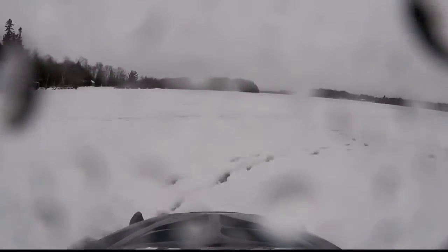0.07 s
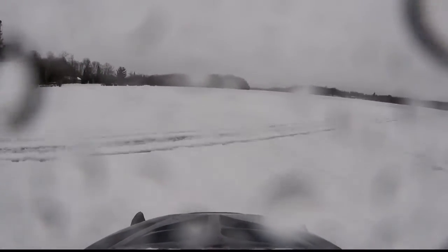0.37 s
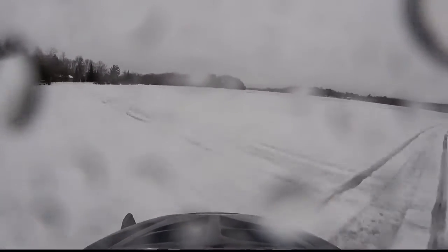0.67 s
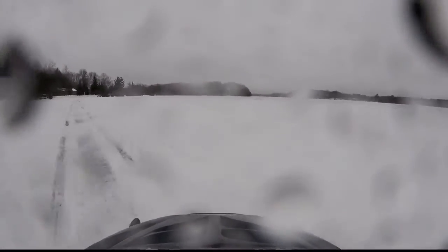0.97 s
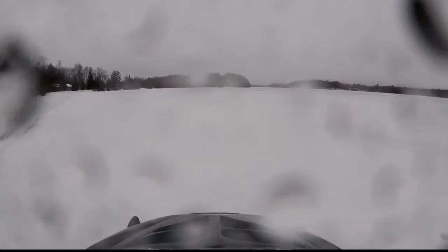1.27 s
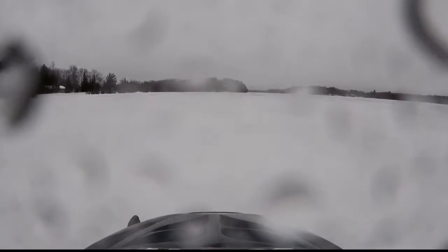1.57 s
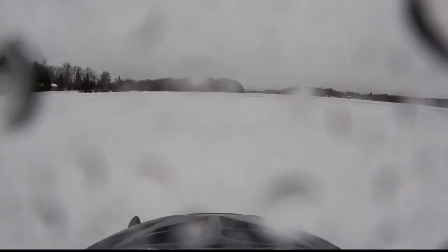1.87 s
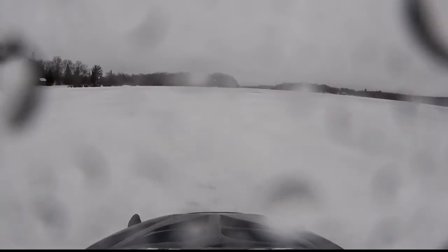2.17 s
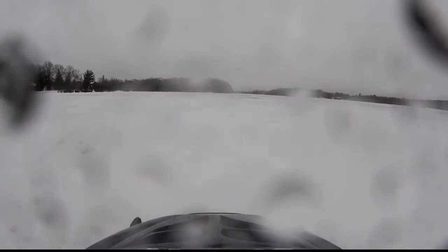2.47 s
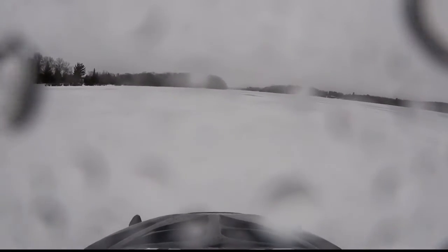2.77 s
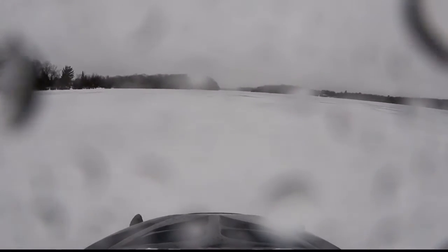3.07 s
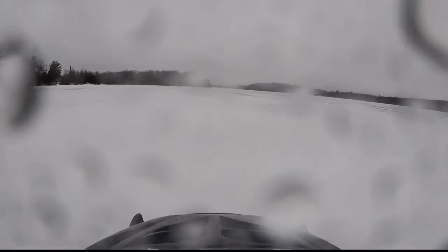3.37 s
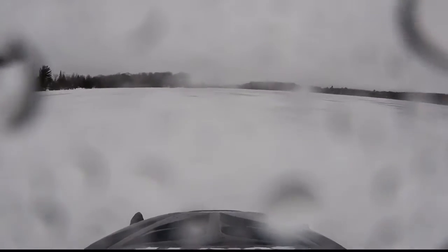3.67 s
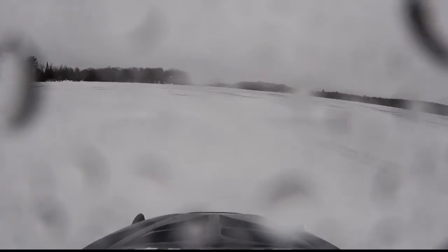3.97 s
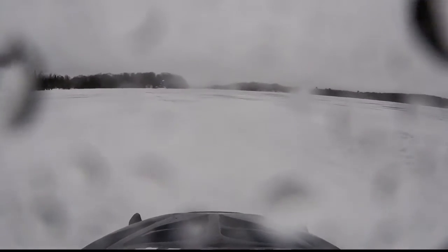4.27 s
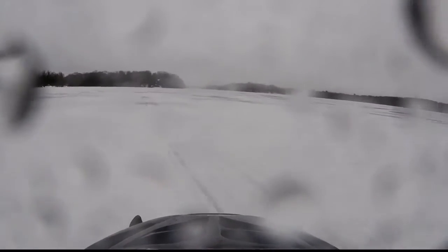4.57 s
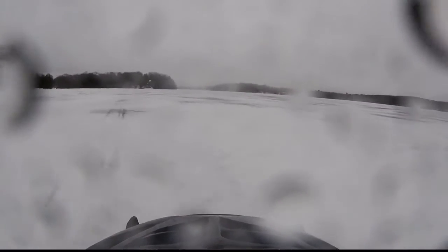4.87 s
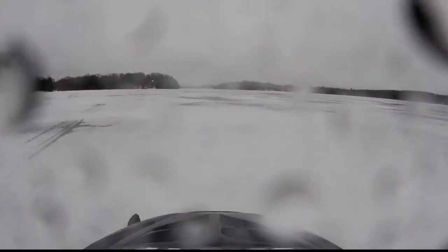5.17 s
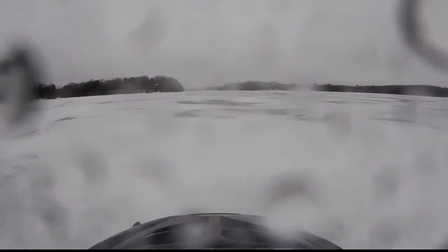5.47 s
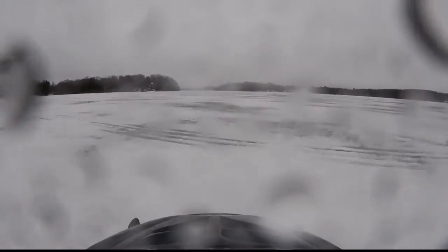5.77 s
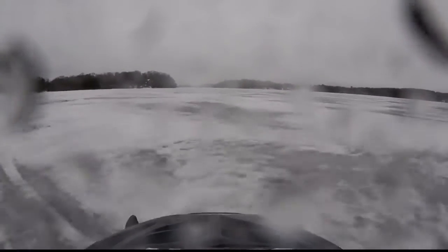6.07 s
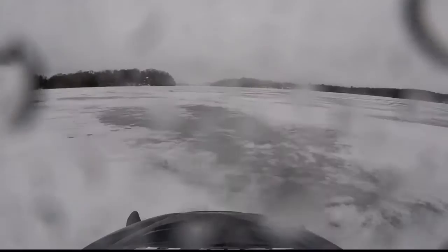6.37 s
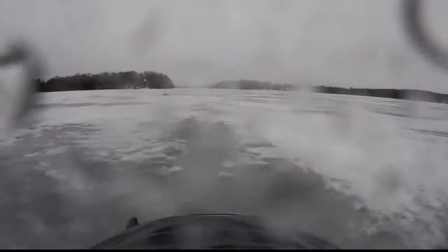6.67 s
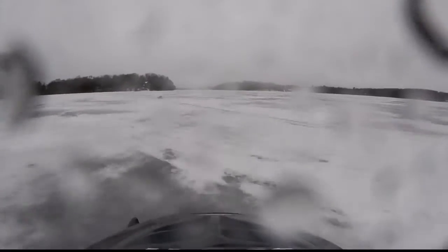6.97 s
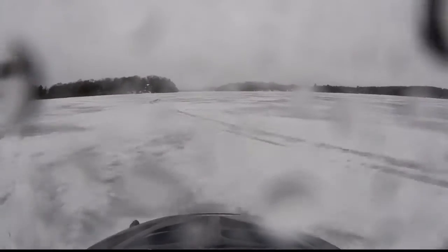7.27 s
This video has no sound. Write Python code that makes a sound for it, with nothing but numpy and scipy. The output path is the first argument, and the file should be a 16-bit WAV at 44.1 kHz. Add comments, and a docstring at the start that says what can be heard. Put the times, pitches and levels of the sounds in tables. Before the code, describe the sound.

A snowmobile runs at speed across a frozen lake, heard up close from the rider's position. Its engine holds a low drone with a thin, raspy whine, wavering only slightly, while the track hums and churns the snow. Wind rumbles on the microphone throughout. Bumps add dull thuds and sharp clicks from the camera housing, which come more often in the last couple of seconds.

```python
"""On a frozen lake, a snowmobile runs at speed, heard from a camera in a closed housing on its rider.
Wind buffets the housing, bumps shake it, and it clicks and knocks, ringing briefly in its modes.
The track hums and churns the snow, the engine rasps and whines as it revs, and the exhaust
drones in harmonics of the firing rate, coloured by the resonances of its pipe.
The camera's limiter ducks under the bumps and recovers slowly."""
import sys
import numpy as np
from scipy.fft import rfft, irfft, next_fast_len
from scipy.io import wavfile
from scipy.ndimage import uniform_filter1d, minimum_filter1d, map_coordinates

SR = 44100
rng = np.random.default_rng(int(sys.argv[2]) if len(sys.argv) > 2 else 0)


def materialize(psi):
    """Save the field psi as 16-bit PCM at rate SR to the path in sys.argv[1].

    A 1-D psi becomes a single channel; in a 2-D psi each row is a channel.
    """
    bounded = np.clip(np.atleast_2d(psi).T, -1, 1)
    quanta = np.round(bounded * 32767).astype(np.int16)
    wavfile.write(sys.argv[1], SR, quanta)


N = 326340


def amp(db):
    """Decibel law: 20 dB is a tenfold amplitude."""
    return np.exp(np.asarray(db) * np.log(10) / 20)


def unit(x):
    """Normalisation to rms 1."""
    return x / np.sqrt(np.mean(x ** 2) + 1e-20)


def curves(rows):
    """Linear interpolation: one value per sample for each column after the time."""
    times, *columns = np.transpose(rows)
    return [np.interp(np.arange(N) / SR, times, column) for column in columns]


def wobble(rate):
    """Random modulation: a smooth curve through rate Gaussian knots a second."""
    knots = rng.standard_normal(int(N * rate / SR) + 4)
    coarse = np.arange(0, N + 64, 64)
    return np.interp(np.arange(N), coarse, map_coordinates(knots, [coarse * rate / SR]))


def filtered(x, response):
    """Linear filtering: the spectrum of x times a frequency response."""
    size = next_fast_len(N + SR // 2)
    return irfft(rfft(x, size) * response(np.fft.rfftfreq(size, 1 / SR)), size)[:N]


def shaped(x, spectrum):
    """Spectral shaping by (frequency [Hz], gain [dB]) points on a log frequency axis."""
    points_hz, db = np.transpose(spectrum)
    return filtered(x, lambda hz: amp(np.interp(np.log(hz + 1), np.log(points_hz), db)))


def coloured(x, spectrum):
    """Colouring at constant power: x shaped, at rms 1."""
    return unit(shaped(x, spectrum))


def turns(rate_hz, jitter):
    """Phase, in cycles, is the integral of a slightly unsteady frequency."""
    return np.cumsum(rate_hz * (1 + jitter * wobble(45))) / SR


def harmonic(cycles, order, flutter_db, flutter_rate, scatter=0.27):
    """Amplitude modulation of one harmonic, at rms 1, its phase offset by up to about scatter cycles."""
    offset = scatter * rng.uniform(-1.01, 1)
    tone = np.cos(2 * np.pi * (order * cycles + offset))
    return unit(tone * amp(flutter_db * wobble(flutter_rate)))


def resonance_db(hz, resonances):
    """Resonance: a partial gains level as its frequency nears a centre."""
    return sum(db / (1 + (2 * (hz - centre) / width) ** 4)
               for centre, width, db in resonances if abs(hz[0] - centre) < 300)


# Eddy pressure: (frequency [Hz], relative level [dB])
EDDY_SPECTRUM = [(8, -29), (15, -6.5), (25, 0.5), (35, 1), (46, -9.5), (62, -18), (80, -16), (125, -23.5),
                 (160, -33), (260, -43), (600, -90.5)]
# Wind strength between gusts: (time [s], level [dB])
WIND_LEVEL = [(0, -17), (1.1, -17.5), (1.4, -19.5), (2.1, -19), (2.4, -17.5), (3.7, -18), (4.03, -25.5),
              (4.25, -19.5), (5.1, -19), (5.8, -16), (6.7, -20.5), (7.4, -15)]

def wind(evenness=0.66, gust_db=1.8, gust_rate=13):
    """Vortex shedding: eddies around the housing push on it in low, rolling bursts."""
    eddies = coloured(rng.standard_normal(N), EDDY_SPECTRUM)
    envelope = np.sqrt(np.abs(uniform_filter1d(eddies ** 2, size=SR // 14)) + 1e-4)
    level_db = curves(WIND_LEVEL)[0] + gust_db * wobble(gust_rate)
    return amp(level_db) * unit(eddies / envelope ** evenness)


def swell(t, length, skew=0.24):
    """Skewed Gaussian pulse near t = 0: quick to rise, slower to fade."""
    u = 2 * t / length + skew
    return np.exp(-(u / (1 + skew * np.sign(u))) ** 2)


# Bumps in the snow: (time [s], length [s], jolt [dB])
SNOW_BUMPS = [(0.767, .06, 5), (0.84, 0.072, 7), (1.193, 0.051, 5.5), (2.273, 0.048, 4),
              (2.642, 0.034, 4.5), (2.927, 0.071, 9), (3.372, 0.052, 4), (3.603, 0.058, 4),
              (3.689, 0.048, 9), (3.799, 0.1, 7.5), (4.144, 0.069, 5.5), (4.344, 0.08, 4.5),
              (4.487, 0.053, 10), (4.921, 0.098, 4.5), (5.13, 0.099, 10), (5.259, 0.042, 10.5),
              (5.487, 0.084, 6.5), (6.194, 0.054, 10.5), (6.346, 0.065, 13.5), (6.568, 0.038, 11),
              (6.732, .05, 6.5), (7.001, 0.12, 1.5), (7.088, 0.068, 4), (7.197, 0.062, 11.5),
              (7.306, .06, 2.5)]

def jolts():
    """Superposition: the pulses of all bumps add to one jolt curve in dB."""
    t = np.arange(N) / SR
    return sum(db * swell(t - at, length) for at, length, db in SNOW_BUMPS)


def shake(mount_hz=30.1, gain_db=-16, detune=0.061):
    """Forced vibration: each bump swings the camera mount for a few cycles."""
    t, out = np.arange(SR // 2) / SR, np.zeros(N + SR)
    t = t - t.mean()
    for at, length, db in SNOW_BUMPS:
        hz = mount_hz * (1 + detune * rng.standard_normal())
        swing = swell(t, length) * np.sin(2 * np.pi * hz * t)
        out[round((at + t[0]) * SR):][:len(t)] += amp(gain_db + db) * swing
    return out[:N]


# Suspension thud: (frequency [Hz], relative level [dB])
THUD_SPECTRUM = [(35, -22.5), (55, 1.5), (80, 4), (130, -3.5), (200, -17), (400, -24.5), (800, -57),
                 (1600, -120)]

def thuds(jolt_db, gain_db=-30):
    """Impact noise: skis and suspension thud raggedly through each bump."""
    ragged = rng.standard_normal(N) * amp(4.4 * wobble(60))
    return amp(gain_db) * (amp(jolt_db) - 1) * coloured(ragged, THUD_SPECTRUM)


# Modes of the housing: (frequency [Hz], level [dB], time to decay by 60 dB [s])
HOUSING_MODES = [(1200, -12, 0.013), (1573, 6.5, .013), (1887, -5, 0.022), (2055, 1, .017),
                 (2250, -2, 0.017), (2863, -3, 0.025), (3110, -2, 0.016), (3520, -7.5, 0.014),
                 (4440, -10.5, 0.021), (4780, -7, 0.012), (5580, -8, 0.011), (6000, -14, 0.0065),
                 (7000, -28.5, 0.0032), (8600, -22, 0.0047), (9300, -13.5, 0.005), (11700, -12.5, 0.0055),
                 (12900, -15, .005)]

def housing_ring(t, bright_hz, scatter_db=2.0, reach_octaves=0.95):
    """Modal response to one impact: a shorter contact excites higher modes."""
    hz, db, t60 = np.transpose(HOUSING_MODES)[:, :, None]
    pitch_draw, level_draw = rng.standard_normal((2, len(hz), 1))
    excitation = 1 / (1 + (np.log2(hz / bright_hz) / reach_octaves) ** 2) ** 2
    decay = amp(db + scatter_db * level_draw - 60 * t / t60)
    waves = np.sin(2 * np.pi * hz * (1 + 0.0095 * pitch_draw) * (t - 0.86 / bright_hz))
    onset = 1 - np.exp(-(1.74 * bright_hz * t) ** 2)  # the contact builds over about a cycle
    return onset * np.sum(excitation * decay * waves, axis=0)


# Faint ticks of the housing: (start [s], end [s], ticks [count], level [dB], brightness [Hz])
TICK_SPANS = [(0, 6.7, 28, -36, 2940), (6.7, 7.4, 24, -47.5, 4500)]

def faint_ticks(gap_s=0.00077, spread_db=5, rebound_db=-6):
    """Random arrivals: ticks scattered uniformly over each span, as rows like HOUSING_CLICKS."""
    return [(start + when * (end - start), db + spread_db * (force - .5), hz,
             gap_s * (spacing + .5), rebound_db)
            for start, end, ticks, db, hz in TICK_SPANS
            for when, force, spacing in rng.random((round(ticks), 3))]


# Clicks and knocks of the camera housing, dull to sharp:
# (time [s], level [dB], brightness [Hz], gap between touches [s], first rebound [dB])
HOUSING_CLICKS = [(.3205, -30.5, 3180, .0009, -3), (.8207, -19.5, 3000, 0.000448, -2.5),
                  (.8289, -15.5, 3300, 0.00127, -3), (.8302, -20, 1400, 0.00072, -9),
                  (1.9819, -30, 3000, 0.00036, -6), (2.2318, -27, 2900, 0.00072, -8),
                  (2.9103, -17.5, 3753, 0.000554, -5), (2.9104, -43, 11000, .0003, -9),
                  (3.5957, -29.5, 2898, 0.00035, -10), (3.6567, -23, 1800, .0006, -18),
                  (3.7548, -25, 3300, 0.0009, -2), (4.49, -29, 2200, .0009, -1),
                  (5.0906, -22, 1799, 0.00044, -9), (5.0944, -14, 1746, 0.00053, -6.5),
                  (5.1103, -24, 1791, .0010, -1), (5.3095, -33, 3700, 0.00146, -12),
                  (5.5067, -19, 3250, 0.000489, -4), (5.507, -49.5, 12010, .0003, -9),
                  (6.0278, -32, 3753, .00049, -7), (6.1392, -28.5, 2527, .00082, -7),
                  (6.2522, -31.5, 3300, .0006, -6), (6.3286, -18, 2127, 0.00135, -12),
                  (6.3326, -27, 2200, 0.00032, -9), (6.5437, -21, 2720, 0.00039, -2),
                  (6.5472, -11, 1949, 0.0005, -7), (6.727, -43, 11400, .00034, -11),
                  (6.766, -55, 12000, .0005, -9), (6.779, -48, 6800, .0005, -9),
                  (6.8398, -31.5, 4340, 0.00058, 1), (6.9105, -34.5, 3200, .00124, -4),
                  (6.9895, -37, 4200, .0008, -3), (7.075, -33, 3790, 0.0015, -4),
                  (7.1, -32, 3207, 0.000718, -7), (7.1172, -21.5, 3180, 0.000456, -7),
                  (7.118, -49.5, 12000, .0003, -7), (7.1583, -29, 2400, .0009, -6),
                  (7.1919, -17, 3280, .00043, -9), (7.1925, -48, 10500, 0.00055, -6),
                  (7.2327, -30, 4300, 0.00135, -1), (7.3365, -45, 3800, .0007, -4),
                  (7.37, -31, 2707, .0009, -1)]
# Transmission of a click through the wall: (frequency [Hz], gain [dB])
WALL_TRANSMISSION = [(3500, -0.5), (4050, -4.5), (4500, -3.5), (6300, -2), (6800, -9.5), (8200, -8),
                     (10500, -2), (13200, -3.5), (15000, -14)]

def housing_clicks(touches=3):
    """Repeated impact: each click is a few quick touches that set the housing ringing."""
    t, out = np.arange(SR // 20) / SR, np.zeros(N + SR)
    for at, db, bright_hz, gap, rebound_db in list(HOUSING_CLICKS) + faint_ticks():
        ring = housing_ring(t, bright_hz)
        click = sum(amp(rebound_db * k * k) * np.interp(t - k * gap, t, ring, left=0)
                    for k in range(touches))
        attack_rms = np.std(click[:130])  # the first 3 ms
        out[round(at * SR):][:len(t)] += amp(db) * click / attack_rms
    return shaped(out[:N], WALL_TRANSMISSION)


# Cogs meeting the belt: (time [s], meshing rate [Hz], level [dB])
COG_MESHING = [(0, 203.2, -34), (.55, 211.6, -33.5), (1.2, 203, -40.5), (1.6, 213.1, -31.5),
               (2.25, 212.9, -32), (2.65, 203.6, -29), (3.05, 208, -34.5), (3.45, 205.7, -30),
               (4.05, 203.8, -32.5), (4.55, 209.3, -40), (5.05, 205, -32.5), (5.45, 206.9, -41.5),
               (6.1, 213.2, -37), (6.4, 211.3, -39), (7.4, 213.7, -46.5)]

def track_hum(jolt_db, slip_per_db=.004, dip_per_db=.5):
    """Meshing tone: cogs meet the belt at a rate set by ground speed, slipping on bumps."""
    cog_hz, hum_db = curves(COG_MESHING)
    cycles = turns(cog_hz, jitter=0.0043 + slip_per_db * jolt_db)
    hum = harmonic(cycles, order=1, flutter_db=2.4, flutter_rate=18)
    return amp(hum_db - dip_per_db * jolt_db) * hum


# Churned snow: (frequency [Hz], relative level [dB])
CHURN_SPECTRUM = [(60, -21.5), (110, 10.5), (160, -1), (220, 4), (260, -2.5), (370, 1), (480, -12),
                  (650, -8), (950, -14), (1300, -17.5), (2500, -51), (8000, -120)]

def snow_churn(effort_db, jolt_db, cruise_db=-37):
    """Modulated noise: the track's lugs churn the snow, harder with effort and on bumps."""
    lumpy = rng.standard_normal(N) * amp(1.12 * wobble(40))
    return amp(cruise_db + 0.91 * effort_db + 0.32 * jolt_db) * coloured(lumpy, CHURN_SPECTRUM)


# The engine's clatter, strongest at 1.5-2.3 kHz, fading above: (frequency [Hz], relative level [dB])
RASP_SPECTRUM = [(700, -43.5), (1300, -13.5), (1550, -1.8), (1900, 0.4), (2300, -1.25), (2550, -9.5),
                 (2850, -5), (3200, -4.5), (3850, -10.5), (4150, -13.5), (4400, -13.5), (5000, -17.5),
                 (6400, -24.5), (7500, -27.5), (8200, -36.5), (9400, -37), (10800, -47.5), (12500, -53),
                 (14000, -81.5)]

def rasp(cycles, effort_db, cruise_db=-38, pulse_db=0.5, grain_db=1.2):
    """Periodically modulated noise: the grainy clatter of engine and drive swells at each firing."""
    beat = amp(pulse_db * np.cos(2 * np.pi * cycles) + grain_db * wobble(500))
    level_db = cruise_db + 1.12 * effort_db + 0.6 * wobble(16)
    return amp(level_db) * coloured(beat * rng.standard_normal(N), RASP_SPECTRUM)


# Partials of the whine: (order [multiple of the firing rate], relative level [dB])
WHINE_PARTIALS = [(11, -24.5), (12, -18), (13, -16), (15, -16), (16, -5.5), (17, -7), (18, -18.5),
                  (19, -6.5), (20, -2.5), (21, -7.5), (22, -27), (23, -23), (24, -15.5), (26, -15.5),
                  (28, -20.5), (30, -14), (32, -13.5), (33, -19), (34, -14.5), (35, -22), (36, -13.5),
                  (38, -25.5), (40, -19.5), (41, -21), (45, -25.5), (46, -21), (47, -20.5), (48, -27)]
# Resonances of the hood: (frequency [Hz], width [Hz], gain [dB])
HOOD_RESONANCES = [(2750, 36, 4), (3310, 45, 8.5), (4336, 110, 3.5)]

def whine(cycles, firing_hz, effort_db, gain_db=-41, cruise_hz=94, db_per_hz=2, strongest_order=20):
    """Phase coherence: partials near the strongest keep in step and buzz once per firing."""
    partials = np.zeros(N)
    for order, db in WHINE_PARTIALS:
        scatter = min(.08 * abs(order - strongest_order), .4)
        tone = harmonic(cycles, order, flutter_db=1.35, flutter_rate=9, scatter=scatter)
        partials += amp(db + resonance_db(order * firing_hz, HOOD_RESONANCES)) * tone
    revving_db = 0.98 * effort_db + db_per_hz * (firing_hz - cruise_hz)
    return amp(gain_db + revving_db) * partials


# Fundamental of the exhaust: (time [s], level [dB])
DRONE_LEVEL = [(0, -22), (.3, -20), (.55, -18), (.73, -21.5), (1.0, -20), (1.2, -22), (1.4, -19),
               (1.7, -18.5), (2.7, -17), (3.1, -21), (3.55, -18.5), (3.9, -26), (4.2, -19), (4.7, -23.5),
               (5.05, -20.5), (5.16, -27.5), (5.3, -22), (5.49, -24), (5.6, -22.5), (6.15, -19.5),
               (6.37, -23), (6.5, -24.5), (6.68, -27), (7.1, -26), (7.4, -26.5)]
# Its overtones: (order [multiple of the firing rate], level re the fundamental [dB])
EXHAUST_OVERTONES = [(3, -28.5), (4, -32.5), (5, -38.5), (6, -39), (7, -37), (8, -40.5), (9, -40.5),
                     (10, -44), (11, -51.5), (14, -47)]
# Resonances of the pipe: (frequency [Hz], width [Hz], gain [dB])
PIPE_RESONANCES = [(648.6, 20, 4.5), (1011, 40, 13), (1295, 40, 5.5)]

def exhaust(cycles, firing_hz, jolt_db, octave_db=-14.5, dip_per_db=0.34):
    """Source and filter: the pipe's resonances lift overtones of a drone that dips on bumps."""
    drone = harmonic(cycles, order=1, flutter_db=0.5, flutter_rate=16)
    drone += amp(octave_db) * harmonic(cycles, order=2, flutter_db=1.5, flutter_rate=12)
    for order, db in EXHAUST_OVERTONES:
        tone = harmonic(cycles, order, flutter_db=0.5, flutter_rate=9)
        drone += amp(db + resonance_db(order * firing_hz, PIPE_RESONANCES)) * tone
    return amp(curves(DRONE_LEVEL)[0] - dip_per_db * jolt_db) * drone


# Engine speed: (time [s], firing rate [Hz])
FIRING_RATE = [(0, 92.7), (.2, 94.2), (.43, 95.4), (.6, 95.2), (.8, 94.67), (1.2, 93.3), (1.38, 94.7),
               (1.5, 95.15), (1.68, 94.95), (1.92, 94.95), (2.18, 94.45), (2.37, 94.2), (2.6, 92.2),
               (2.8, 93.4), (3.04, 93.47), (3.18, 94.3), (3.33, 92.2), (3.5, 92), (3.64, 91.46),
               (3.93, 92.2), (4.15, 95.4), (4.3, 94.53), (4.4, 94), (4.5, 93.8), (4.62, 94.97),
               (4.87, 94.87), (5.02, 92.6), (5.3, 92.23), (5.5, 93.1), (5.82, 93.05), (6.05, 94.33),
               (6.3, 93.5), (6.55, 94.37), (6.9, 93.73), (7.2, 94.3), (7.4, 93.7)]

def engine(effort_db, jolt_db):
    """Phase locking: exhaust, whine and rasp all follow one firing cycle."""
    firing_hz, = curves(FIRING_RATE)
    cycles = turns(firing_hz, jitter=.0003)
    return (exhaust(cycles, firing_hz, jolt_db) + whine(cycles, firing_hz, effort_db)
            + rasp(cycles, effort_db))


# How hard the machine works: (time [s], effort re cruising [dB])
MACHINE_EFFORT = [(0, -0.7), (.3, 1.2), (.55, 1.5), (1.15, -0.5), (1.6, 2.1), (2.7, 3), (3.05, -0.2),
                  (3.6, 1), (3.95, -2.5), (4.14, 0.5), (4.32, 0.7), (4.65, -3.5), (5.0, 0.5), (5.35, -2),
                  (6.1, 0.8), (6.65, -4), (7.1, -1.5), (7.4, -2)]

def scene():
    """Superposition: machine, wind, bumps and clicks add at one microphone."""
    effort_db, = curves(MACHINE_EFFORT)
    jolt_db = jolts()
    machine = engine(effort_db, jolt_db) + track_hum(jolt_db) + snow_churn(effort_db, jolt_db)
    return (machine + wind() + shake() + thuds(jolt_db) + housing_clicks())[None]


def record(dry):
    """Peak limiting: the camera's gain ducks at once and recovers slowly; a low-pass follows."""
    ceiling, recover_db_per_s, top_hz = 0.58, 19, 15100
    over_db = 20 * np.log10(np.maximum(np.abs(dry[0]) / ceiling, 1))
    recovery_db = recover_db_per_s * np.arange(N) / SR
    duck_db = np.maximum.accumulate(over_db + recovery_db) - recovery_db
    held_gain = minimum_filter1d(amp(-duck_db), size=SR // 300)
    gain = uniform_filter1d(held_gain, size=SR // 300)
    return filtered(dry[0] * gain, lambda hz: hz < top_hz)[None]


dry = scene()
out = record(dry)
materialize(out)
```